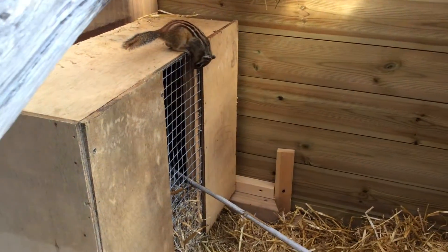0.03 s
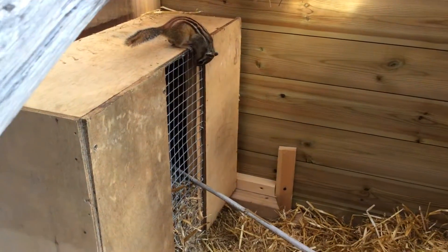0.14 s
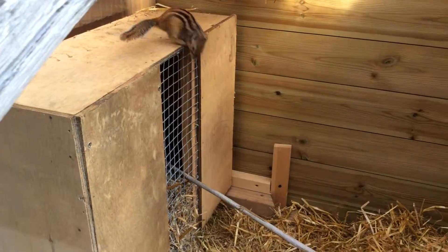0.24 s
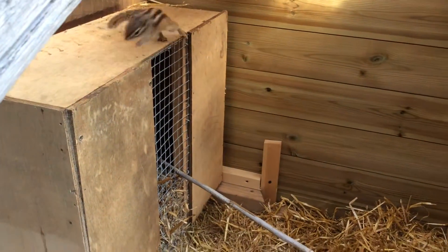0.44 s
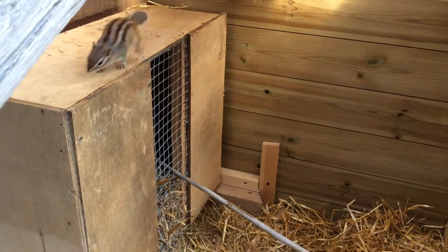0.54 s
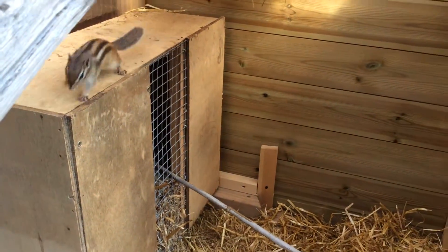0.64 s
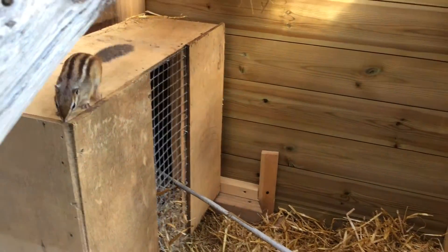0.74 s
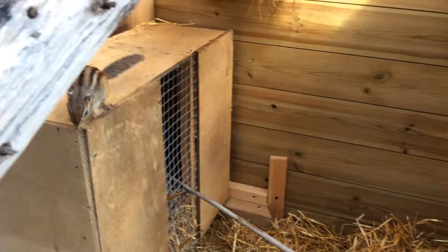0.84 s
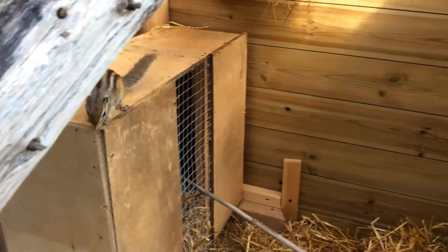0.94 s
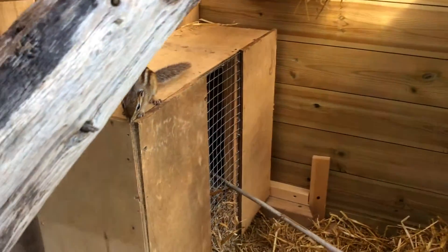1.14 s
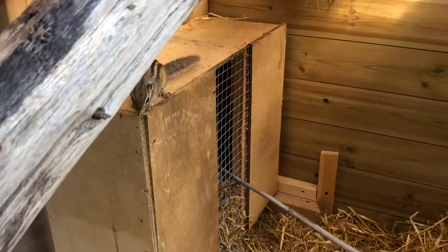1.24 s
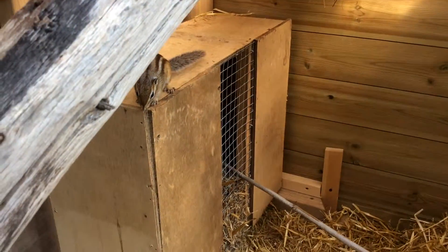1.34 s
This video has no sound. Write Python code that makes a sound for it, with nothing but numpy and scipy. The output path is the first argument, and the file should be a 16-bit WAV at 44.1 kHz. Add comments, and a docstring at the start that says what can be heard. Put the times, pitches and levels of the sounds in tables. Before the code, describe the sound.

A single sharp knock on plywood dies away quickly inside a small wooden enclosure. A chipmunk's feet then scuff and patter, barely audible, against soft room noise, a faint wavering hum and a thin high whine.

```python
"""A chipmunk springs across a plywood nest box in a small wooden enclosure, with one sharp knock.
The impact excites the normal modes of the box, and the ringing dies quickly between the plank walls.
A dull bump follows; feet and fur scuff the wood by friction, and paws thud faintly on the lid.
Behind it lie quiet room noise, a wavering hum and a thin high whine that comes and goes."""
import sys
import numpy as np
from scipy import signal
from scipy.fft import rfft, irfft
from scipy.io import wavfile

SR = 44100
rng = np.random.default_rng(int(sys.argv[2]) if len(sys.argv) > 2 else 0)


def store_wav(level_fs):
    """Save 16-bit WAV to argv[1]."""
    pcm = np.round(np.clip(np.atleast_2d(level_fs), -1, 1) * 32767)
    wavfile.write(sys.argv[1], SR, pcm.T.astype(np.int16))


N = 61739

# Spectrum of the room noise. Each row: frequency in Hz, relative density in dB.
ROOM_SPECTRUM = [(25, -29), (38, -11), (52, -2.5), (80, -3.5), (120, -2), (190, -4.5), (380, -7.5),
                 (700, -4.5), (1100, -10.5), (2000, -18.5), (3500, -20), (8000, -19), (11000, -28.5),
                 (13500, -39), (16000, -42.5)]
# Slow swing of the room noise above HISS_FROM_HZ. Each row: time in seconds, gain in dB.
HISS_GAIN = [(0, -1.5), (.15, 2), (.45, -2), (.58, -2.5), (.72, 0), (.87, 1.5), (1.0, -1.5), (1.2, -1),
             (1.36, 0)]
ROOM_DB, ROOM_FLICKER_DB, HISS_FROM_HZ = -65, 1.02, 560

# Envelope of the hum's main tone. Each row: time in seconds, level in dB.
HUM_ENVELOPE = [(0, -62.5), (.1, -62.5), (.3, -59.5), (.45, -65.5), (.6, -63.5), (.72, -66.5), (.82, -69),
                (.9, -65.5), (.98, -68), (1.06, -61), (1.13, -66), (1.2, -63), (1.4, -64.5)]
# Weaker tones of the hum. Each row: frequency in Hz, level in dB, waver in dB.
HUM_WEAK_TONES = [(685, -80, 4), (385, -82, 4), (121.4, -79.5, 3)]
HUM_HZ, HUM_WANDER_HZ, HUM_WAVER_DB = 601.8, 1.12, 0.45

# Envelope of the whine. Each row: time in seconds, level in dB.
WHINE_ENVELOPE = [(0, -74), (.2, -80), (.35, -70.5), (.41, -77.5), (.445, -95), (.472, -72), (.545, -68),
                  (.58, -73.5), (.625, -65.5), (.68, -75), (.73, -71), (.80, -85), (.92, -69.5), (.98, -82),
                  (1.03, -70), (1.12, -79.5), (1.221, -74.5), (1.26, -80), (1.31, -72), (1.4, -93)]
WHINE_HZ, WHINE_WANDER_HZ, WHINE_FLUTTER_DB, WHINE_OCTAVE_DB = 5414, 12, 1.4, -19

# Feet and fur rubbing the wood. Each row: peak time in seconds, Gaussian half-width in seconds,
# level in dB, centre frequency in Hz, half-bandwidth in octaves.
SCUFF_STROKES = [(0.014, 0.046, -63.5, 6500, 0.52), (0.058, 0.043, -68.5, 2880, 0.29),
                 (0.311, .036, -58.5, 6760, .6), (0.608, 0.015, -73, 1390, 0.76),
                 (.735, 0.0079, -73.5, 7100, .4), (0.772, 0.012, -68.5, 1150, 0.38),
                 (0.89, 0.036, -72.5, 6800, 0.42), (1.227, .011, -68.5, 8500, 0.21)]
SCUFF_GRAIN_DB = 1

# Contacts that make up the knock. Each row: start in seconds, level in dB relative to CRACK_DB.
KNOCK_CONTACTS = [(0.2061, -11), (0.2071, -2), (0.2112, -3)]
# Spectrum of the bare contact. Each row: frequency in Hz, relative density in dB.
CRACK_SPECTRUM = [(200, -7), (1000, -1), (3000, -30.5), (5500, -4), (7500, 1), (8800, -11.5), (11000, -9),
                  (13000, -26), (16000, -27.5)]
CRACK_DB, CRACK_T60_S = -17, .012
# Normal modes of the box. Each row: frequency in Hz, level in dB relative to BOX_DB, T60 in seconds.
BOX_RESONANCES = [(51.9, -22, 0.28), (147.9, -15, 0.32), (265, -7.5, 0.19), (311, -8.5, .21),
                  (402.6, -8, 0.25), (429.3, -2.5, 0.2), (600.4, -3, 0.1), (654.6, -7.5, .15),
                  (787.3, -9, .14), (989.3, -2.5, .12), (1289, -6.5, 0.09), (1505, -5.5, 0.15),
                  (2207.4, -3, 0.14), (2787, -8.5, 0.056), (3117, -6, .16), (3702, -3.5, 0.11),
                  (4230, -6, 0.11), (4415, -3, 0.0816), (4944, 0.5, 0.075), (6030, 3, 0.097),
                  (6700, -0.5, .075), (7570, 0, 0.068)]
BOX_DB = -29.5
# Dense ringing of panels and enclosure. Each row: frequency in Hz, relative density in dB.
PANEL_SPECTRUM = [(35, -17), (55, -5), (80, -6.5), (150, -2.5), (400, -0.5), (720, -3.5), (1300, 0),
                  (1800, -4), (2700, 1), (4800, -1.5), (7500, 0), (8700, -9.5), (10800, -7.5),
                  (12500, -21.5), (15500, -32)]
# Decay of that ringing. Each row: frequency in Hz, T60 in seconds.
PANEL_DECAY = [(60, 0.32), (250, 0.22), (700, 0.17), (2800, 0.15), (5500, 0.09), (9000, 0.085),
               (15000, 0.07)]
PANEL_DB, BUILD_CYCLES, BUILD_S = -20.5, 2.3, 0.0012
TAIL_DB, TAIL_T60_S = -51.5, 0.56

# Spectrum of the soft second bump. Each row: frequency in Hz, relative density in dB.
BUMP_SPECTRUM = [(60, -26), (300, 15), (600, -16), (1500, -12), (3500, -9), (8000, -36), (15000, -39)]
BUMP_START_S, BUMP_DB, BUMP_T60_S = .249, -32.5, 0.045

# Paws landing on the lid. Each row: start in seconds, level in dB.
PAW_STEPS = [(0.404, -60.5), (.455, -72), (0.519, -64.5), (.61, -65), (.665, -66)]
# Spectrum of the lid's thud. Each row: frequency in Hz, relative density in dB.
THUD_SPECTRUM = [(60, -26), (140, -11), (220, -11), (370, 6), (500, -18), (1000, -30), (4000, -53)]
THUD_T60_S, THUD_RISE_S = 0.35, 0.0053

CUTOFF_HZ = 15500


def from_db(db):
    """Amplitude ratio of a level in decibels."""
    return 10 ** (np.asarray(db) / 20)


def rms_one(x):
    """Normalisation to unit rms."""
    return x / np.sqrt(np.mean(x ** 2) + 1e-20)


def clock():
    """Time of each sample in seconds."""
    return np.arange(N) / SR


def at_hz(points, hz):
    """Interpolation of a table on a log-frequency axis."""
    f, value = np.transpose(points)
    return np.interp(np.log(np.maximum(hz, 1)), np.log(f), value)


def over_time(points):
    """Linear interpolation of a table at every sample time."""
    return np.interp(clock(), *np.transpose(points))


def drift(corner_hz):
    """Random fluctuation: low-passed Gaussian noise with a spread of about 1."""
    f = np.arange(2 * N + 1) * SR / (4 * N)
    white = rfft(rng.standard_normal(4 * N))
    return rms_one(irfft(white / (1 + (f / corner_hz) ** 2)))[:N]


def noise_bands(spectrum, count=20):
    """Random-phase noise of unit rms, split into overlapping bands as (centre in Hz, band) pairs."""
    f = np.arange(N // 2 + 1) * SR / N
    bins = from_db(at_hz(spectrum, f)) * np.exp(2j * np.pi * rng.random(len(f)))
    bins = bins / np.std(irfft(bins, N))
    centres = np.geomspace(40, 15000, count)
    return [(hz, irfft(bins * at_hz(np.c_[centres, share], f), N))
            for hz, share in zip(centres, np.eye(count))]


def noise(spectrum):
    """Complementary bands sum to coloured noise of unit rms."""
    return sum(band for _, band in noise_bands(spectrum, count=2))


def tone_phase(hz, wander_hz):
    """Phase is the integral of frequency, which here wanders slightly."""
    return 2 * np.pi * (np.cumsum(hz + wander_hz * drift(9)) / SR + rng.random())


def decay(start, t60, rise_s):
    """Envelope of a damped vibration: a quick rise, then an exponential fall of 60 dB in t60 seconds."""
    age = np.maximum(clock() - start, 0)
    return (1 - np.exp(-age / rise_s)) * np.exp(-np.log(1000) * age / t60)


def room():
    """Broadband air noise under amplitude modulation: each band flickers, and the hiss slowly swings."""
    hiss_db = over_time(HISS_GAIN)
    return sum(band * from_db(ROOM_DB + ROOM_FLICKER_DB * drift(15) + hiss_db * (hz > HISS_FROM_HZ))
               for hz, band in noise_bands(ROOM_SPECTRUM))


def hum():
    """Superposition of sinusoids: one clear tone swells and sinks over three weaker ones."""
    amplitude = from_db(over_time(HUM_ENVELOPE) + HUM_WAVER_DB * drift(24))
    main = amplitude * np.sin(tone_phase(HUM_HZ, HUM_WANDER_HZ))
    weak = sum(from_db(db + waver_db * drift(3.6)) * np.sin(tone_phase(hz, HUM_WANDER_HZ))
               for hz, db, waver_db in HUM_WEAK_TONES)
    return np.sqrt(2) * (main + weak)  # rms to peak amplitude


def whine():
    """Amplitude modulation makes a high tone and its second harmonic flutter, swell and fade."""
    phase = tone_phase(WHINE_HZ, WHINE_WANDER_HZ)
    amplitude = from_db(over_time(WHINE_ENVELOPE) + WHINE_FLUTTER_DB * drift(30))
    return np.sqrt(2) * amplitude * (np.sin(phase) + from_db(WHINE_OCTAVE_DB) * np.sin(2 * phase))


def scuffs():
    """Sliding friction of feet and fur on wood gives short swells of grainy, band-limited noise."""
    f = np.geomspace(100, 16000, 60)
    friction = 0
    for peak_s, half_width_s, db, hz, octaves in SCUFF_STROKES:
        passband_db = -10 * np.log10(1 + (np.log2(f / hz) / octaves) ** 6)
        grains = rms_one(noise(np.c_[f, passband_db]) * from_db(SCUFF_GRAIN_DB * drift(250)))
        swell = np.exp(-.5 * ((clock() - peak_s) / half_width_s) ** 2)
        friction += from_db(db) * grains * swell
    return friction


def contact_crack():
    """A brief force has a broad spectrum: each hard contact gives a short burst of noise."""
    envelope = sum(from_db(CRACK_DB + db) * decay(start, CRACK_T60_S, rise_s=.0001)
                   for start, db in KNOCK_CONTACTS)
    return noise(CRACK_SPECTRUM) * envelope


def box_modes(start):
    """Free vibration of the struck box: each normal mode is a damped sinusoid."""
    ringing = 0
    for hz, db, t60 in BOX_RESONANCES:
        phase = 2 * np.pi * (hz * clock() + rng.random())
        ringing += from_db(BOX_DB + db) * decay(start, t60, rise_s=1 / hz) * np.sin(phase)
    return ringing


def panel_ringing(start):
    """Overlapping modes of panels and enclosure merge into decaying noise with a faint reverberant tail."""
    ringing = 0
    for hz, band in noise_bands(PANEL_SPECTRUM):
        rise_s = BUILD_S + BUILD_CYCLES / hz  # lows take longer to swell
        early = from_db(PANEL_DB) * decay(start, at_hz(PANEL_DECAY, hz), rise_s)
        tail = from_db(TAIL_DB) * decay(start, TAIL_T60_S, rise_s)
        ringing += band * (early + tail)
    return ringing


def knock():
    """Impact excitation: the contacts crack, and the first sets the box and panels ringing."""
    start = KNOCK_CONTACTS[0][0]
    return contact_crack() + box_modes(start) + panel_ringing(start)


def bump():
    """A soft impact excites mainly low frequencies: a dull second bump within the dying knock."""
    return from_db(BUMP_DB) * noise(BUMP_SPECTRUM) * decay(BUMP_START_S, BUMP_T60_S, rise_s=0.00091)


def footfalls():
    """Light impacts of the paws excite a faint, low, damped vibration of the lid."""
    envelope = sum(from_db(db) * decay(start, THUD_T60_S, THUD_RISE_S) for start, db in PAW_STEPS)
    return noise(THUD_SPECTRUM) * envelope


def scene():
    """Linear superposition: the pressures of all sources add at one point."""
    return (knock() + bump() + scuffs() + footfalls() + room() + hum() + whine())[None]


def record(dry):
    """An elliptic low-pass filter steeply attenuates the highest treble."""
    lowpass = signal.ellip(10, .1, 80, CUTOFF_HZ, fs=SR, output="sos")
    return signal.sosfilt(lowpass, dry)


dry = scene()
out = record(dry)
store_wav(out)
```